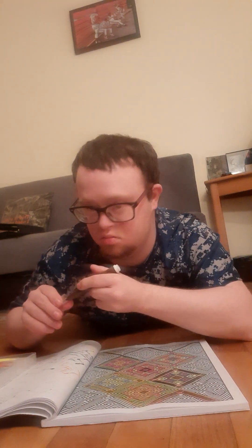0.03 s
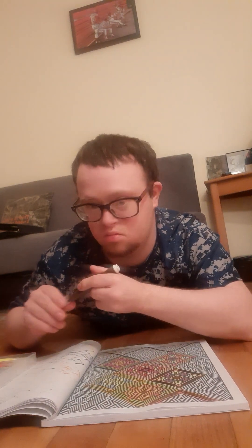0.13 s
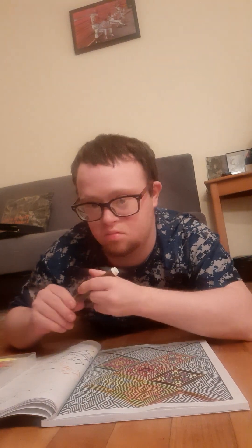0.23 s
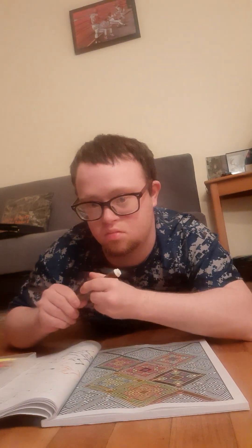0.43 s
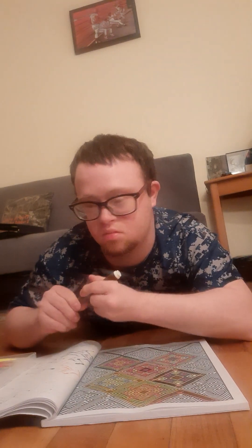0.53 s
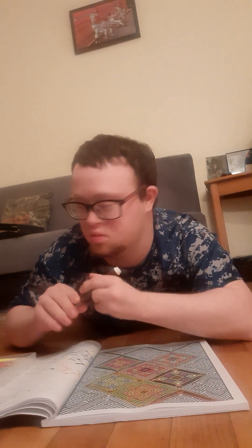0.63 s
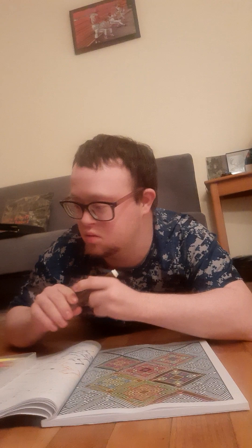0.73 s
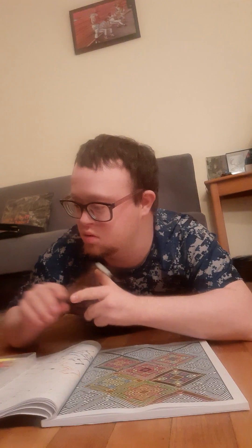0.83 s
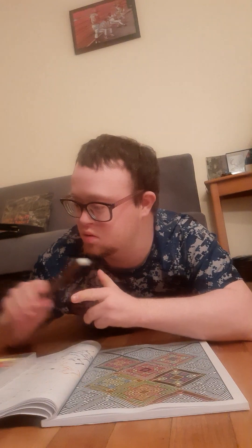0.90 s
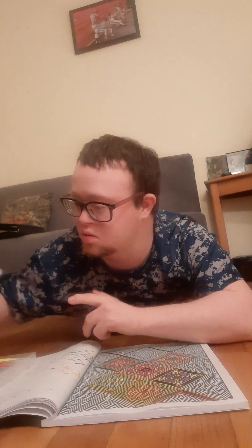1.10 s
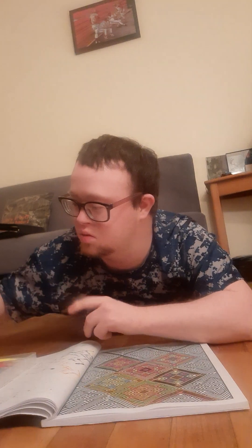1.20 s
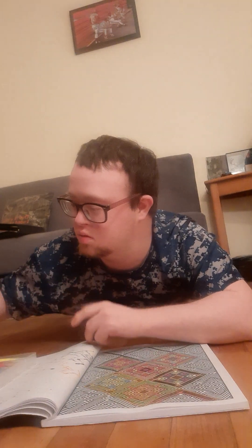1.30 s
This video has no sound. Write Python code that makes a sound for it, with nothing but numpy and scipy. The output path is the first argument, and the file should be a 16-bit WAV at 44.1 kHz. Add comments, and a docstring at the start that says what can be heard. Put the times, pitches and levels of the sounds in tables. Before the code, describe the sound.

A marker cap clicks shut close to the microphone. Fingers first shift on the plastic and the cap slides with a short scrape and soft knock; the sharp snap echoes briefly in a quiet, faintly humming room.

```python
"""A plastic cap is pushed onto a marker by hand, over a table in a quiet room with low hum and hiss.
Fingers shift and squeak on the barrel. Near 0.2 s the cap scrapes along it in tiny slips and
catches, and the barrel knocks in the grip. At 0.41 s the cap snaps home: one sharp click rings
the plastic, and table and walls throw it back. A few faint finger shifts follow."""
import sys
import numpy as np
from scipy import signal
from scipy.fft import rfft, irfft
from scipy.io import wavfile

SR = 44100
rng = np.random.default_rng(int(sys.argv[2]) if len(sys.argv) > 2 else 0)


def unload_audio(sound):
    """Save the sound as a 16-bit wav file, at the path given as the first command line argument."""
    columns = np.transpose(np.atleast_2d(sound))
    # keep every value between -1 and 1, then stretch to whole-number steps
    steps = np.round(np.clip(columns, -1, 1) * 32767)
    wavfile.write(sys.argv[1], SR, steps.astype(np.int16))


N = 59535
T = np.arange(N) / SR
HZ = np.maximum(np.fft.rfftfreq(2 * N, 1 / SR), 1)
TILT_PIVOT_HZ = 8000


def from_db(db):
    """Decibels to gain."""
    return 10 ** (np.asarray(db) / 20)


def at_hz(points, hz):
    """Read (freq_hz, value) points on a log-frequency axis."""
    points = np.array(points)
    return np.interp(np.log(hz), np.log(points[:, 0]), points[:, 1])


def pan(db):
    """Stereo gains for a left-minus-right level."""
    return from_db(np.array([[db], [-db]]) / 2)


def clicks(rows):
    """One impulse per (start_s, level_db, ...) row."""
    out = np.zeros(N)
    for start_s, db, *_ in rows:
        out[int(start_s * SR)] += from_db(db)
    return out


def rough_click(start_s, decay_s):
    """Unit impulse plus a decaying stereo noise burst of equal energy."""
    burst = rng.standard_normal((2, N)) * np.exp(-np.abs(T - start_s) / decay_s) * (T > start_s)
    return clicks([(start_s, 0)]) + burst / np.linalg.norm(burst, axis=1, keepdims=True)


def ring(x, hz, t60_s):
    """Two-pole resonator; a unit click rings at height 1."""
    radius, angle = from_db(-60 / (t60_s * SR)), 2 * np.pi * hz / SR
    return signal.lfilter([1, 0, -1], [2, -4 * radius * np.cos(angle), 2 * radius ** 2], x + 1e-18)


def colour(x, points):
    """Minimum-phase filter through (freq_hz, gain_db) points."""
    cepstrum = irfft(np.log(from_db(at_hz(points, HZ))))
    cepstrum[1:N] *= 2
    cepstrum[N + 1:] = 0
    return irfft(rfft(x, 2 * N) * np.exp(rfft(cepstrum)))[..., :N]


# hum tones: pitch_hz, level_db
HUM_TONES = [(256.5, -62), (293.5, -67.5), (347, -70), (694.4, -73)]


def hum(waver=0.86):
    """Low tones, each wandering in amplitude and phase."""
    out, knots_s = 0, np.linspace(0, T[-1], 12)
    for hz, db in HUM_TONES:
        depth, phase = (np.interp(T, knots_s, v) for v in waver * rng.standard_normal((2, 12)))
        out = out + np.sqrt(2) * from_db(db) * (1 + depth) * np.sin(2 * np.pi * hz * T + phase)
    return out


# noise spectrum: freq_hz, density_db
AIR_SPECTRUM = [(25, -32), (45, -19), (68, -7), (120, -13.5), (165, -7.5), (205, -12.5), (260, -2),
                (480, 2), (620, -5), (790, -8), (1000, -4), (1220, -21.5), (1500, -19.5), (2000, -28),
                (2550, -30), (2850, -26), (3300, -38.5), (5000, -41.5), (7700, -31), (9500, -47.5),
                (11000, -36), (13000, -34), (15800, -36.5)]
# left-right likeness of the noise: freq_hz, correlation
AIR_CORRELATION = [(60, 0.38), (150, 0.34), (380, 1), (950, -0.17), (2380, -0.53), (5980, 0.3),
                   (15000, -0.03)]
# slow swell of noise and hum: time_s, gain_db
SWELL = [(0, 0.5), (.12, -1), (.5, 2), (.75, -2), (1.0, -.5), (1.2, 0.5), (1.33, -2.5)]


def background(air_db=-54.5, whine_db=-80.5):
    """Low rush, hiss and hum, swelling slightly, plus a thin steady whine."""
    mid, side = rfft(rng.standard_normal((2, 2 * N)))
    correlation = at_hz(AIR_CORRELATION, HZ)
    white = np.sqrt(1 + correlation) * mid + np.sqrt(1 - correlation) * side * [[1], [-1]]
    air = irfft(from_db(at_hz(AIR_SPECTRUM, HZ)) * white)[:, :N]
    whine = ring(rng.standard_normal((2, N)), hz=2830, t60_s=0.014)
    swell = from_db(np.interp(T, *np.transpose(SWELL)))
    return swell * (from_db(air_db) * air / air.std() + hum()) + from_db(whine_db) * whine / whine.std()


# room decay: freq_hz, t60_s
ROOM_DECAY = [(300, .6), (1200, 0.54), (2800, 0.34), (5500, 0.39), (7200, 0.33), (9000, 0.25), (11500, .28),
              (15500, .25)]


def room_tail(start_s=0.0024, build_s=0.028):
    """Diffuse response that builds up, then dies band by band."""
    out, white = np.zeros((2, N)), rfft(rng.standard_normal((2, 2 * N)))
    age_s = np.maximum(T - start_s, 0)
    build = np.sqrt(1 - np.exp(-age_s / build_s))
    edges_hz = np.geomspace(100, 18000, 29)
    for low, high in zip(edges_hz, edges_hz[1:]):
        envelope = build * from_db(-60 * age_s / at_hz(ROOM_DECAY, np.sqrt(low * high)))
        band = irfft(white * (HZ >= low) * (HZ < high))[:, :N]
        out += envelope / np.linalg.norm(envelope) * band
    return out


# echo arrivals: delay_s
ECHO_DELAYS_S = [.0035, .0056, .0087]
# echo strengths: left_db, right_db
ECHO_LEVELS = [(-3.5, -17.5), (-9.5, -20.5), (-22.5, -19)]


def early_echoes(smear_s=0.0007):
    """Response of the table and near surfaces: spikes with a short scatter."""
    out = np.zeros((2, N))
    for delay_s, (left_db, right_db) in zip(ECHO_DELAYS_S, ECHO_LEVELS):
        out += from_db([[left_db], [right_db]]) * rough_click(delay_s, smear_s)
    return out


# finger squeaks: centre_s, half_width_s, pitch_hz, level_db
FINGER_SQUEAKS = [(0.037, 0.005, 8200, -70.5), (0.066, 0.031, 2750, -68), (0.168, 0.018, 12100, -68.5),
                  (0.201, .004, 2350, -50.5), (1.187, 0.013, 13400, -79)]


def squeaks(relative_bandwidth=0.04):
    """Fingers stick and slip on plastic: friction noise in one narrow resonance."""
    out = 0
    for centre_s, half_width_s, hz, db in FINGER_SQUEAKS:
        t60_s = np.log(1000) / (np.pi * relative_bandwidth * hz)
        tone = ring(rng.standard_normal(N), hz, t60_s)
        envelope = from_db(db) * np.exp(-((T - centre_s) / half_width_s) ** 2)
        out = out + envelope * tone / tone.std()
    return out


# barrel knocks in the grip: start_s, level_db
GRIP_KNOCKS = [(0.2203, -40), (0.4101, -47.5)]


def knocks():
    """The barrel stops short in the hand with a soft low knock."""
    return ring(clicks(GRIP_KNOCKS), hz=330, t60_s=0.095)


# catches of the sliding cap: start_s, level_db, tilt_db_per_octave
CAP_CATCHES = [(0.175, -12.5, 0), (0.1809, -12, -3), (0.1879, -3.5, 4.5), (0.1912, -3, 6.5),
               (0.1951, 1, 0.5), (0.1994, 1.5, -1), (0.202, -3.5, 2), (0.2045, -2.5, 2), (0.2208, 6, 3),
               (0.2236, -0.5, 5), (0.2315, -2.5, 4.5), (0.232, -3.5, 1)]


def catches(crunch_s=0.001):
    """Each catch lets go with a tick and a brief crunch, dull or bright."""
    out = 0
    for start_s, db, tilt in CAP_CATCHES:
        slope = [(TILT_PIVOT_HZ / 4, db - 2 * tilt), (TILT_PIVOT_HZ * 2, db + tilt)]
        out = out + colour(rough_click(start_s, crunch_s), slope)
    return out


# fingers shifting on the barrel: centre_s, half_width_s, level_db
FINGER_SHIFTS = [(0.045, 0.018, -36.5), (0.672, 0.014, -37.5), (0.93, .04, -48.5), (1.222, 0.028, -51.5)]
# plastic rubbing on plastic: freq_hz, gain_db
RUB_SPECTRUM = [(200, -29), (600, -29), (1500, -26.5), (2350, -17.5), (3300, -21), (6000, -25), (8100, -21),
                (9500, -33.5), (12400, -22), (15500, -27.5)]


def rubbing(start_s=0.183, rise_s=0.0053, hold_s=0.057, fall_s=0.036,
            slips_per_s=1600, slide_db=-21.5, spread_db=4.5):
    """Dense tiny slips and a few catches as the cap slides; fainter slips under the fingers."""
    corners_s = start_s + np.cumsum([0, rise_s, hold_s, fall_s])
    effort = from_db(slide_db) * np.interp(T, corners_s, [0, 1, 1, 0])
    for centre_s, half_width_s, db in FINGER_SHIFTS:
        effort += from_db(db) * np.exp(-((T - centre_s) / half_width_s) ** 2)
    sizes = from_db(spread_db * np.minimum(rng.exponential(1, N), 3))
    signs = rng.choice([-1, 1], N)
    slips = sizes * signs * (rng.random(N) < slips_per_s / SR)
    return pan(db=-1.5) * colour(effort * slips + catches(), RUB_SPECTRUM)


# cap snapping home and settling: start_s, level_db, tilt_db_per_octave
SNAP_HITS = [(0.4089, -27, 0), (0.4099, 1, 0), (0.4214, -13, 6), (0.4222, -12, 4)]
# cap resonances: pitch_hz, level_db, t60_s
CAP_MODES = [(920, -44, 0.017), (2230, -33, 0.014), (2970, -29.5, .012), (4000, -24.5, 0.013),
             (5130, -23, .008), (5875, -20.5, 0.008), (6790, -14.5, 0.0041), (8250, -18.5, 0.0055),
             (10960, -19, .006), (12200, -14.5, .004), (12950, -15.5, .005), (14400, -27.5, 0.0062),
             (15300, -33, .005)]


def snap(crack_hz=1100, crack_db=-21.5):
    """The cap jumps its ridge: a dull broad crack and the short-lived modes of the plastic."""
    modes = 0
    for k, (hz, db, t60_s) in enumerate(CAP_MODES):
        octaves = np.log2(hz / TILT_PIVOT_HZ)
        force = clicks([(start_s, hit_db + tilt * octaves) for start_s, hit_db, tilt in SNAP_HITS])
        modes = modes + (-1) ** k * from_db(db) * ring(force, hz, t60_s)
    band = signal.butter(1, [crack_hz / 2, crack_hz * 2], "band", fs=SR, output="sos")
    crack = signal.sosfilt(band, clicks(SNAP_HITS) + 1e-18)
    return pan(db=-3.5) * (modes + from_db(crack_db) * crack)


# snap radiated into the room: freq_hz, gain_db
SPREAD_SPECTRUM = [(150, -13), (400, -1.5), (1000, -10), (1600, -12.5), (2300, -2.5), (3300, 3.5),
                   (4400, 2), (5700, 8), (7100, 7.5), (9500, -6), (11300, 5), (12900, 3), (15500, -5)]


def snap_spread():
    """The snap as it spreads in all directions."""
    return colour(clicks(SNAP_HITS), SPREAD_SPECTRUM)


def scene():
    """Marker, early echoes, room tail and background."""
    handling = rubbing() + squeaks() + knocks()
    direct = snap() + handling
    room_feed = snap_spread() + from_db(-2.5) * handling
    echoes = signal.fftconvolve(direct, early_echoes(), axes=1)[:, :N]
    tail = signal.fftconvolve(room_feed, room_tail(), axes=1)[:, :N]
    return direct + echoes + tail + background()


# colour of the two microphone ports: freq_hz, left_minus_right_db
PORT_BALANCE = [(300, -2), (1000, 0), (2000, 6.5), (2900, 6), (4200, 3.5), (6900, 0.5), (7600, -1.5),
                (8400, -9.5), (9100, -9.5), (10000, 0), (11200, 1.5), (12600, -0.5), (15500, -4)]
CUTOFF_HZ = 15700


def record(dry):
    """Each port colours its channel; a steep low-pass cuts the top."""
    left = colour(dry[0], [(hz, db / 2) for hz, db in PORT_BALANCE])
    right = colour(dry[1], [(hz, -db / 2) for hz, db in PORT_BALANCE])
    lowpass = signal.ellip(10, 0.1, 80, CUTOFF_HZ, fs=SR, output="sos")
    return signal.sosfilt(lowpass, [left, right])


dry = scene()
out = record(dry)
unload_audio(out)
```